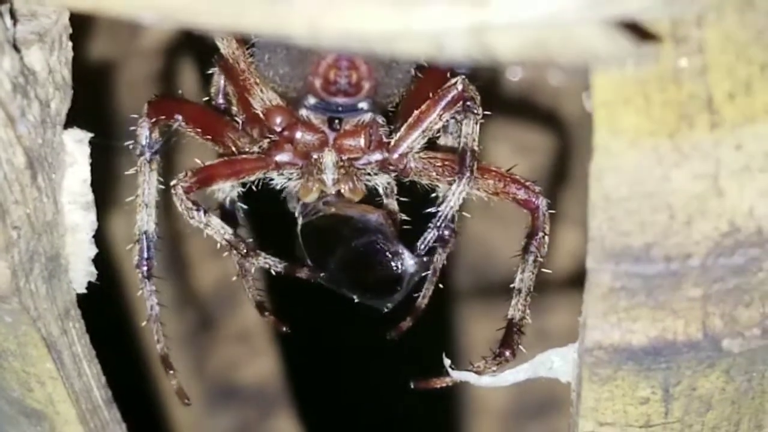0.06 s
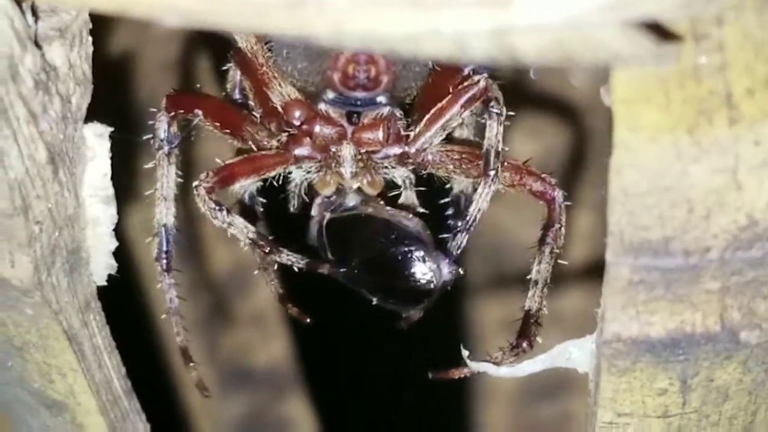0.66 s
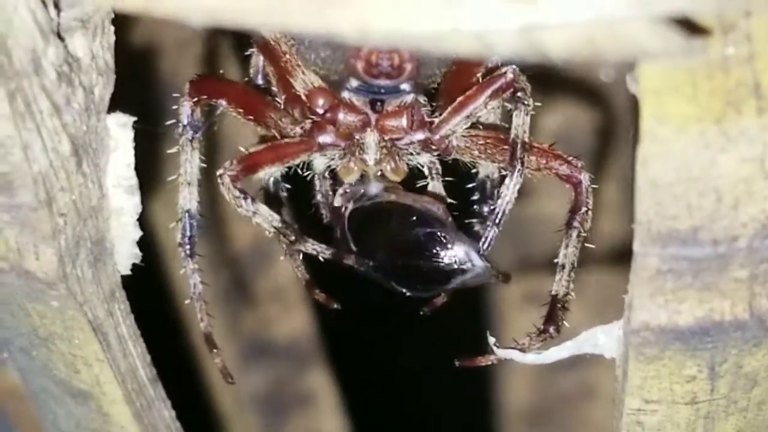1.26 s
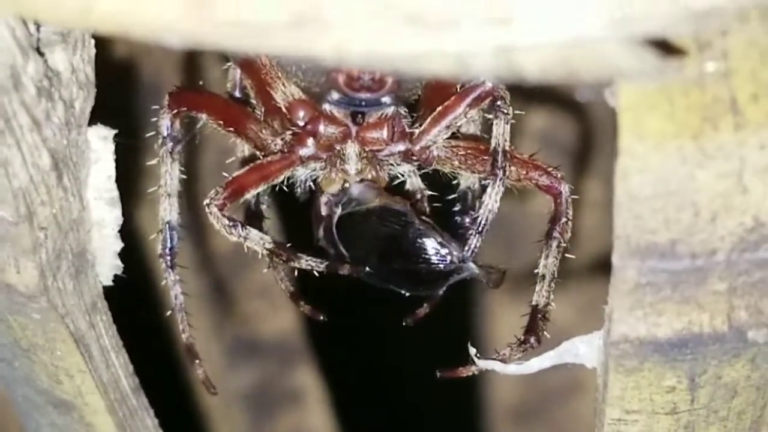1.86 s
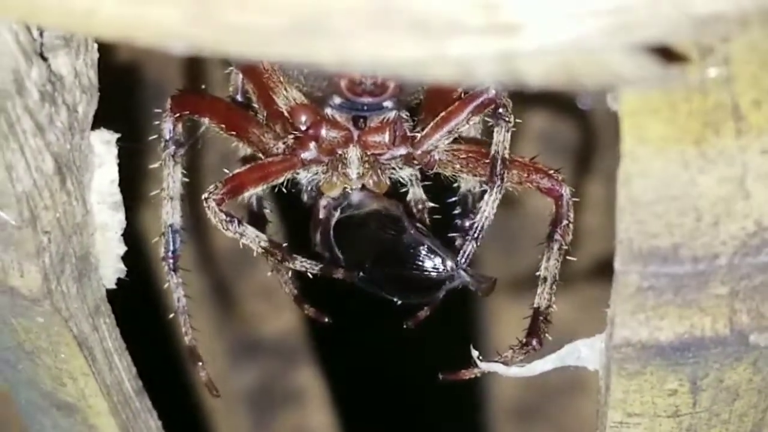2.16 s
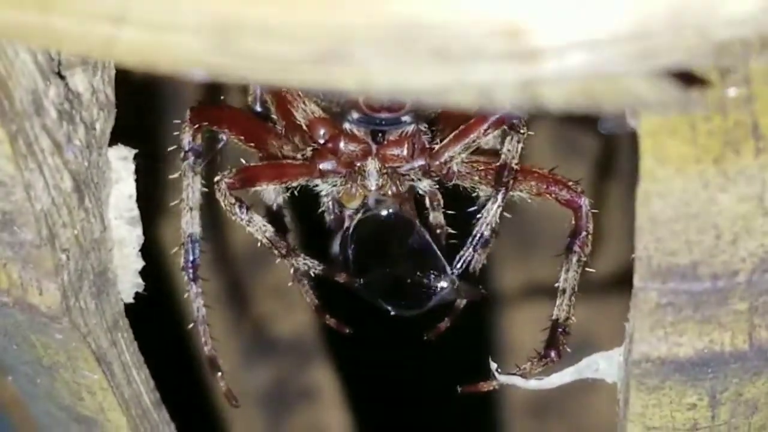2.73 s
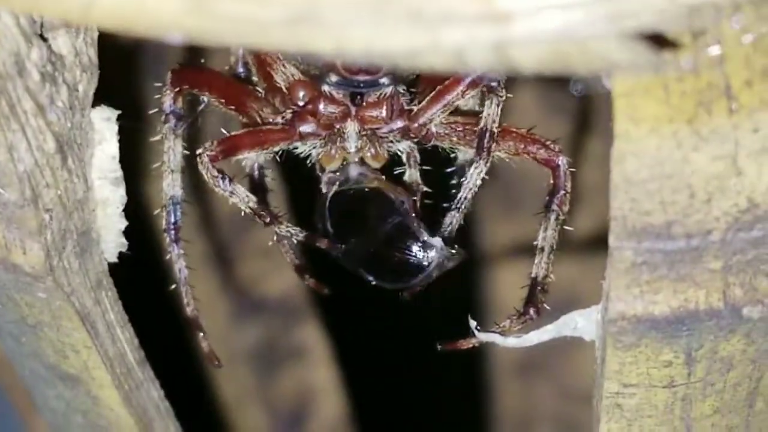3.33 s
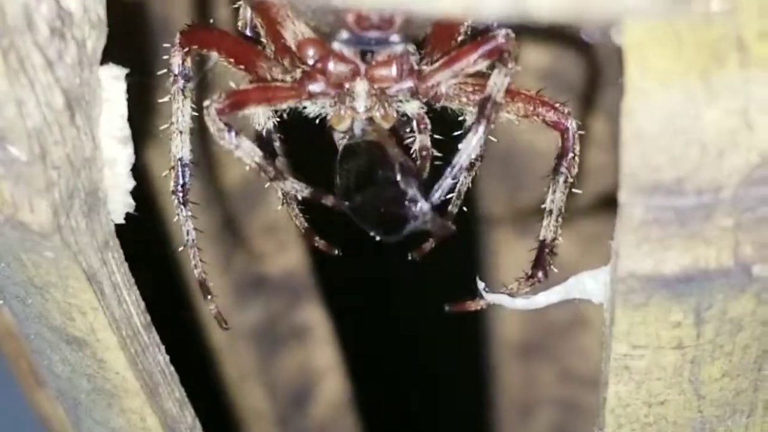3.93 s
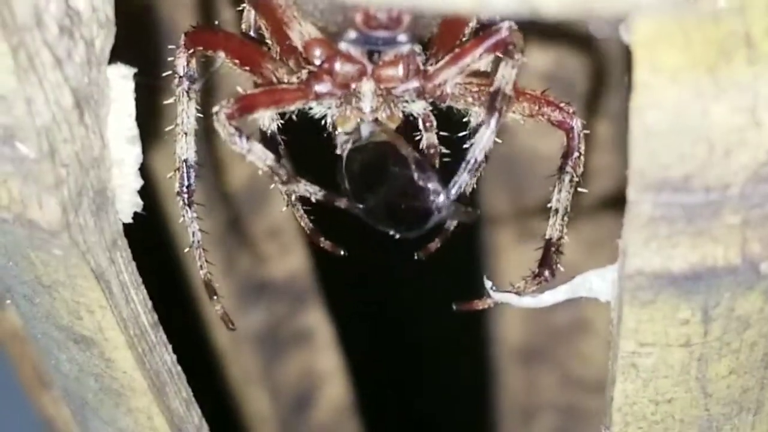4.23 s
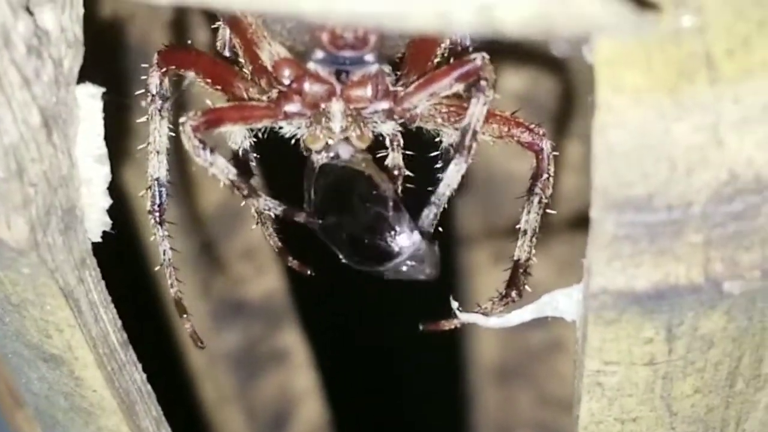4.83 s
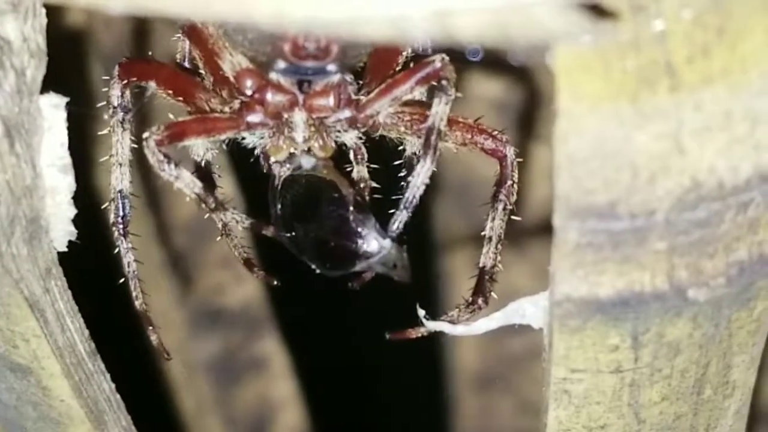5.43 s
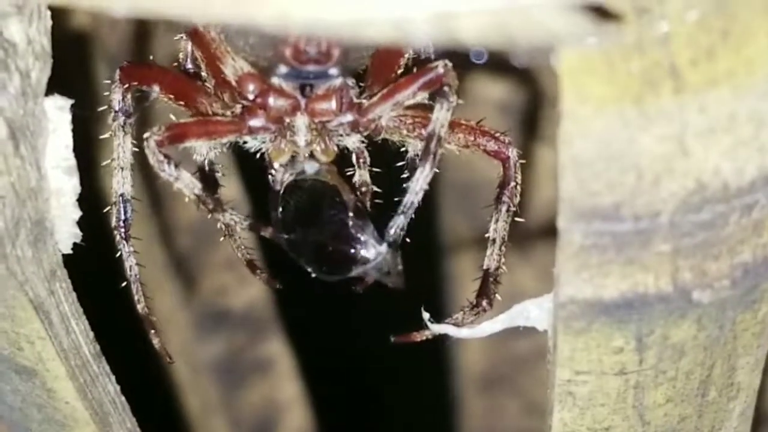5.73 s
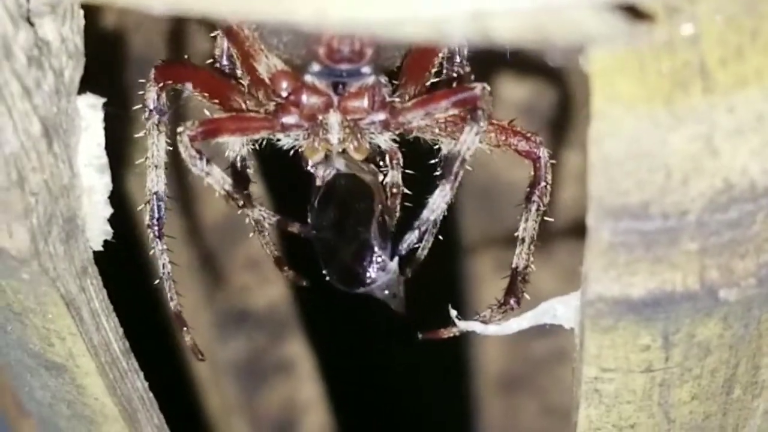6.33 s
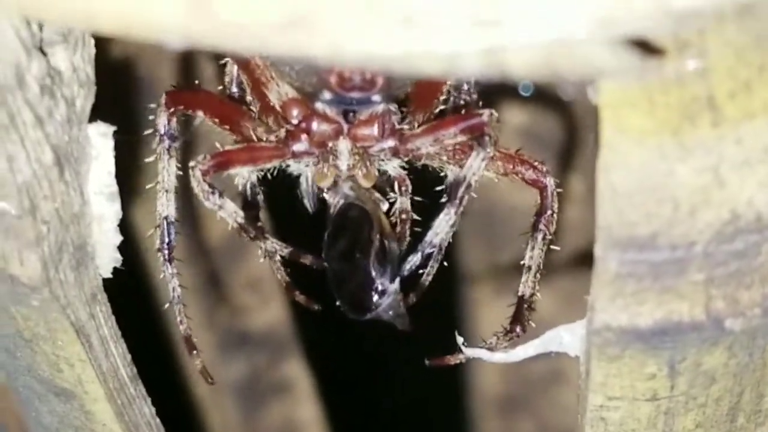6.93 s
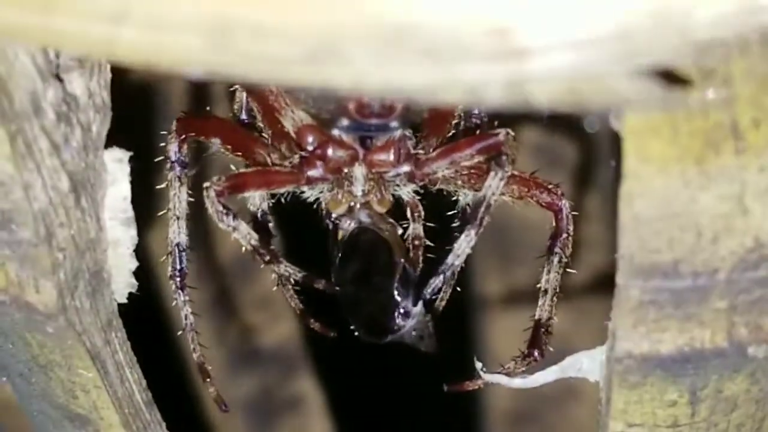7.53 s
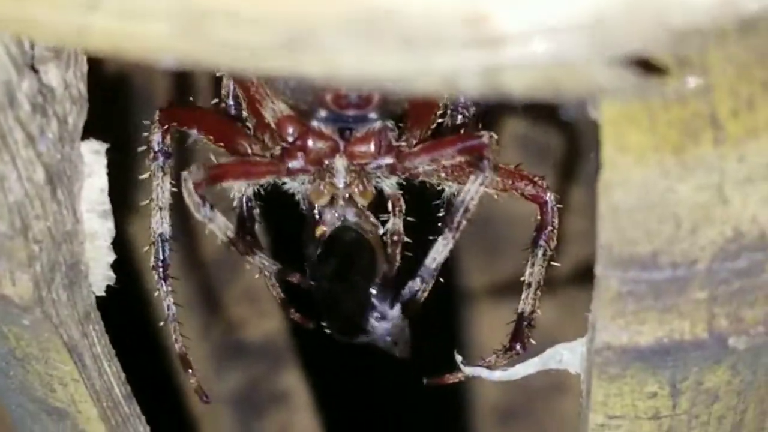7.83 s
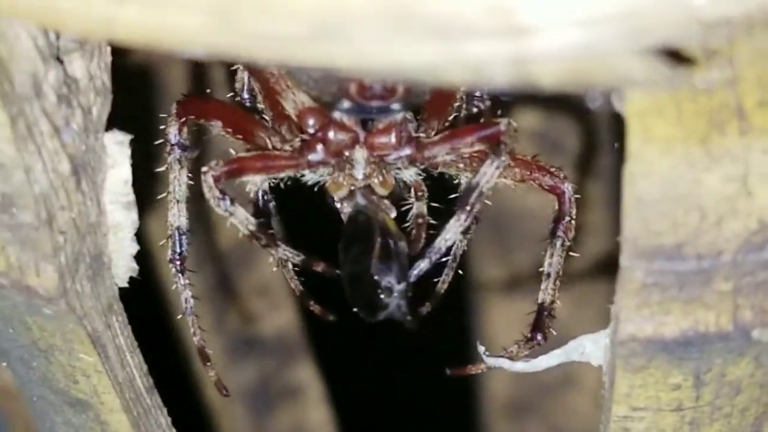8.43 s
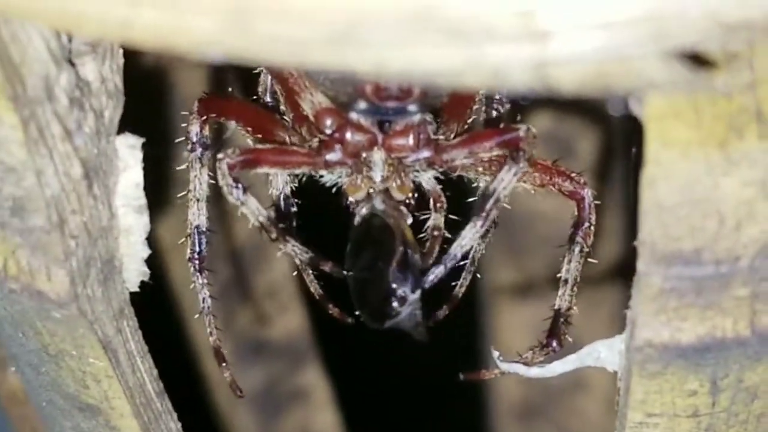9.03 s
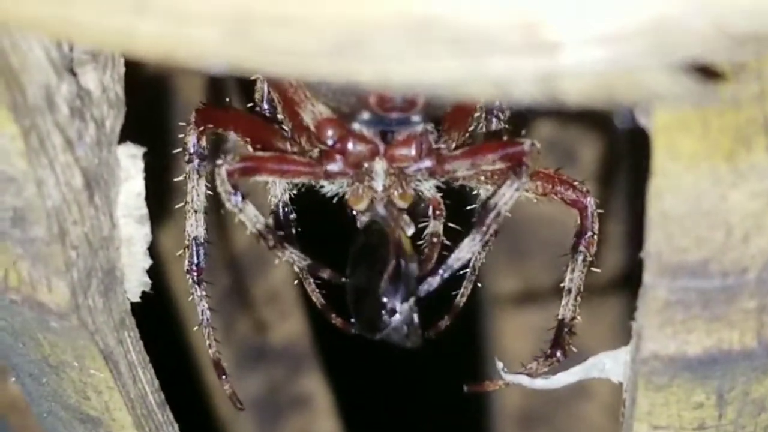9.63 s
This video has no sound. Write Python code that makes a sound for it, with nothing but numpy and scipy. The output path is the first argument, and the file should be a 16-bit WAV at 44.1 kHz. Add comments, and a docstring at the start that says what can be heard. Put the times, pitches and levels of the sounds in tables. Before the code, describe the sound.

Many crickets sing together outdoors at night: a steady, pure trill below shrill buzzes and evenly repeating high chirps. During the first three seconds a hand shifts on the microphone, making several sharp, loud clicks and soft rubs close on the left. The chorus then carries on, with a katydid giving brief dry rasps now and then over a distant insect shimmer and a faint motor hum.

```python
"""Outdoors at night, in a cricket chorus. Each closing stroke rings a cricket's wing: tree crickets
trill low, field crickets buzz and chirp above them. A katydid rasps now and then; a far swarm
shimmers over a faint motor hum. Early on, a hand shifts its grip on the microphone's case:
skin sticks and slips, ticking at the left port."""
import sys
import numpy as np
from scipy import signal
from scipy.fft import rfft, irfft, next_fast_len
from scipy.io import wavfile
from scipy.ndimage import map_coordinates

SR = 44100
rng = np.random.default_rng(int(sys.argv[2]) if len(sys.argv) > 2 else 0)


def pcm_store(signal):
    """Save signal as 16-bit PCM."""
    levels = np.round(np.clip(np.atleast_2d(signal), -1, 1) * 32767)
    wavfile.write(sys.argv[1], SR, levels.astype(np.int16).T)


N = 426888
TIME = np.arange(N) / SR

# how openly the chorus arrives, with a one-second dip: time_s, gain_db
OPENNESS = [(0, 3), (1.3, .5), (1.55, -1.5), (2.05, -3), (2.35, -4.5), (2.6, 0.5), (3.2, 1), (3.7, 0.5),
            (4.4, 2), (7, 2), (9.68, 2)]
# motor tones: pitch_hz, level_db
MOTOR_TONES = [(40, -80.5), (75.5, -65), (94.4, -72), (119, -74.5), (151, -82.5), (226.5, -81.5)]
# motor rumble: freq_hz, density_db
RUMBLE_SPECTRUM = [(15, -15), (42, 5.5), (90, 4), (130, 0), (180, -4), (240, -9), (330, -13.5), (450, -43),
                   (800, -61)]
# night hiss, left: freq_hz, density_db
HISS_LEFT = [(200, -10.5), (450, -23.5), (750, -11), (1150, -16), (1350, -0.5), (1600, -1.5), (1900, -8),
             (2500, -7), (3500, -11), (6000, -20), (8500, -58), (10800, -15.5), (14500, -21.5)]
# night hiss, right: freq_hz, density_db
HISS_RIGHT = [(1700, -63.5), (2000, 2), (2500, -2.5), (3500, -4), (6000, -6), (8500, -44), (10500, -8.5),
              (12500, -6), (14300, 4.5), (14900, -13.5), (15500, -60)]
# far swarm: freq_hz, density_db
SWARM_SPECTRUM = [(3000, -81), (3800, -37), (4300, -12), (4750, -0.5), (5150, -4.5), (5600, 1.5),
                  (6000, -3.5), (6400, -10), (6900, -13), (7500, -23.5), (8200, -62), (10000, -68)]
# chirps of the lower chirping cricket: centre_s
LOW_CHIRPS_S = [.12, .55, .88, 1.25, 1.81, 2.22, 2.6, 2.96, 3.49, 3.83, 4.2, 4.6, 5.17, 5.57, 5.94, 6.37,
                6.72, 7.08, 7.5, 7.86, 8.21, 8.66, 9.08, 9.55]
# katydid rasp: freq_hz, density_db
RASP_SPECTRUM = [(5000, -59), (6800, 9.5), (8500, -4), (10000, 4.5), (12500, -4.5), (15000, 13)]
# katydid phrases: first_syllable_s, level_db, syllable_count
KATYDID_PHRASES = [(2.03, -54.5, 5), (6.035, -46, 6), (8.815, -43.5, 4)]
# grip ticks: peak_s, level_db, ring_hz, t60_s, snap_re_ring_db
GRIP_TICKS = [(0.1091, -12, 1035, 0.008, 0), (0.1275, -22.5, 830, 0.008, -7),
              (0.2203, -38, 910, 0.004, 10.5), (0.3024, -5, 640, 0.0064, -9.5),
              (0.3185, -25, 720, 0.011, -1), (0.5035, -28.5, 820, 0.009, -12),
              (0.5458, -1, 740, 0.0054, -13), (0.8287, -9.5, 704, 0.014, -9.5),
              (0.879, -27, 270, 0.014, -23), (0.9796, -22.5, 447, 0.004, -18),
              (1.2415, -19.5, 640, 0.0035, -21), (1.278, -15, 440, 0.0055, -26),
              (1.2916, -20.5, 570, 0.0064, -20), (1.3463, -21, 547, 0.012, -20),
              (1.364, 0.5, 636, 0.005, -16), (1.3702, -16.5, 889, 0.009, -9),
              (2.2486, -36, 492, 0.0075, -20), (2.2872, -32, 932, 0.0038, -18),
              (2.4217, -34, 630, 0.0065, -20), (2.579, -34, 163, 0.016, -25),
              (2.7982, 0, 505, 0.0052, -13.5), (2.8118, -17.5, 800, 0.011, -5),
              (2.945, -18.5, 240, 0.011, -27), (3.685, -32, 1583, 0.006, -10),
              (4.3965, -40.5, 520, 0.004, -13)]
# bright modes of the case: pitch_hz, gain_db, t60_s
SNAP_MODES = [(2470, -0.5, 0.0043), (3837, -7, 0.0024)]
# fingers creeping in tiny slips: start_s, end_s, slip_count, level_db
FINGER_CREEPS = [(0.329, 0.779, 6, -34.5), (0.881, 1.36, 10, -31.5), (1.999, 2.751, 3, -43)]
# skin sliding on the case: centre_s, level_db, width_s
SKIN_RUBS = [(0.308, -37, 0.04), (0.557, -53.5, 0.058), (0.906, -38, 0.04), (1.292, -48, 0.066),
             (1.381, -38, 0.046), (2.807, -40, 0.048), (2.961, -47.5, 0.039)]
# skin friction: freq_hz, density_db
SKIN_SPECTRUM = [(30, -17), (90, 6.5), (500, -2), (1200, -10.5), (3000, -8), (5000, -25.5), (9000, -55.5)]
# swells of the lower field cricket: centre_s, level_db, width_s
BUZZ_SWELLS = [(0.204, -62, 0.82), (1.156, -45.5, .22), (2.605, -52.5, .15), (3.256, -50, 0.28),
               (4.242, -52.5, .15), (5.07, -49.5, 0.25), (5.49, -52, .14), (6.7, -49.5, 0.17),
               (7.48, -53, .19), (8.337, -58, 0.2), (8.715, -50, 0.12), (8.89, -46.5, 0.15)]
# loud bouts of the far tree cricket: start_s, end_s
FAR_TRILL_BOUTS = [(-.3, 0.52), (2.65, 3.9), (4.35, 6.15), (7.7, 11)]
# wing strokes of the near tree cricket: time_s, rate_hz
NEAR_STROKE_RATE = [(0, 45.42), (3, 45.39), (6, 45.29), (9.68, 45.27)]
# effort of the near tree cricket: time_s, level_db
NEAR_EFFORT = [(0, -50.5), (1.2, -51.5), (1.7, -52.5), (2.9, -50.5), (4.4, -51), (6.6, -48), (8.1, -49.5),
               (9.68, -49)]


def amp(db):
    """Decibels to gain."""
    return 10 ** (np.asarray(db) / 20)


def unit(x):
    """Scale to rms 1."""
    return x / np.sqrt(np.mean(x ** 2) + 1e-20)


def curve(rows):
    """(time_s, value) rows to one value per sample."""
    return np.interp(TIME, *np.transpose(rows))


def wobble(rate_hz):
    """Smooth random curve with knots at rate_hz."""
    knots = rng.standard_normal(int(N * rate_hz / SR) + 4)
    return map_coordinates(knots, [TIME * rate_hz], order=2, mode="nearest")


def filtered(x, response):
    """Apply a frequency response."""
    size = next_fast_len(N + 8192)
    return irfft(rfft(x, size) * response(np.fft.rfftfreq(size, 1 / SR)), size)[..., :N]


def noise(spectrum, channels=1):
    """Coloured noise, rms 1."""
    freq_hz, db = np.transpose(spectrum)
    white = rng.standard_normal((channels, N))
    return unit(filtered(white, lambda hz: amp(np.interp(np.log(hz + 1), np.log(freq_hz), db))))


def swell(centre_s, width_s):
    """Hann hump, width at half height."""
    return np.interp(TIME, centre_s + width_s * np.linspace(-1, 1, 33), np.hanning(33))


def bouts(spans_s, fade_s):
    """1 within each span, 0 between, linear fades."""
    return sum(np.clip(np.minimum(TIME - start, end - TIME) / fade_s + .5, 0, 1)
               for start, end in spans_s)


def pan(right_db):
    """Left and right gains."""
    return amp([[-right_db / 2], [right_db / 2]])


def outdoors(song, wet_db, t60_s, right_db, lag_s):
    """A song reaches the right port late; leaves and walls scatter it."""
    t = np.arange(SR // 3) / SR
    tail = rng.standard_normal((2, len(t))) * amp(-60 * t / t60_s)
    scatter = signal.fftconvolve(song[None], tail, axes=1)[:, :N]
    scatter = np.array([unit(side) for side in scatter])
    direct = np.array([song, filtered(song, lambda hz: np.exp(-2j * np.pi * hz * lag_s))])
    return unit(unit(direct) + amp(wet_db) * scatter) * pan(right_db)


def motor():
    """Distant hum in a low rumble, nearly alike at both ports."""
    hum = np.zeros(N)
    for hz, db in MOTOR_TONES:
        peak = np.sqrt(2) * amp(db + 1.2 * wobble(2.27))
        hum += peak * np.sin(2 * np.pi * hz * TIME + .33 * wobble(2.2))
    rumble = amp(-66.5) * noise(RUMBLE_SPECTRUM) + amp(-70) * noise(RUMBLE_SPECTRUM, channels=2)
    return (hum + rumble) * pan(-1.3)


def night_hiss():
    """Steady hiss, coloured differently on each side."""
    return np.vstack([amp(-53.5) * noise(HISS_LEFT), amp(-53) * noise(HISS_RIGHT)])


def swarm():
    """Countless far crickets merge into a fluttering shimmer."""
    flutter = amp(1.7 * np.array([wobble(250), wobble(250)]) + .48 * wobble(11))
    return amp(-46) * unit(noise(SWARM_SPECTRUM, channels=2) * flutter) * pan(9.6)


def wings(strokes, hz, fall_hz, duty, jitter_cycles, uneven_db=1, stumble_db=0):
    """Each closing stroke rings the wing; pitch falls as it slows. strokes is a running count."""
    index = np.floor(strokes - np.floor(strokes.min())).astype(int)
    offset, force = rng.standard_normal((N // 100, 2))[index].T
    progress = np.clip(strokes % 1 / duty, 0, 1)
    age_s = strokes % 1 / np.gradient(strokes, 1 / SR)
    cycles = age_s * (hz + fall_hz * (1 - progress) / 2) + jitter_cycles * offset
    stumbles = force < -1.8
    pressure = np.abs(np.sin(np.pi * progress ** .89)) * amp(uneven_db * force + stumble_db * stumbles)
    return unit(pressure * np.sin(2 * np.pi * cycles))


def chirping_cricket(times_s, hz, fall_hz, stroke_hz, width_s, level_db):
    """Wing strokes in short swelling chirps."""
    strokes = stroke_hz * TIME + .16 * wobble(5)
    song = wings(strokes, hz + 45 * wobble(8), fall_hz, duty=.92, jitter_cycles=.35)
    song *= sum(swell(s, width_s) for s in times_s)
    return amp(level_db) * outdoors(song, wet_db=4.5, t60_s=.17, right_db=10, lag_s=.0002)


def katydid(period_s=.088, width_s=.062, last_stress_db=2.5):
    """Phrases of dry, toothy rasps, loosely paced, the last rasp stressed."""
    syllables = np.zeros(N)
    for first_s, db, count in KATYDID_PHRASES:
        for k, (late, size) in enumerate(rng.standard_normal((count, 2))):
            stress_db = last_stress_db * (k == count - 1) + 1.1 * size
            syllables += amp(db + stress_db) * swell(first_s + k * period_s + .003 * late, width_s)
    rasp = unit(noise(RASP_SPECTRUM, channels=2) * amp(1.9 * wobble(630)))
    return syllables * rasp * pan(8.8)


def ring(t, hz, t60_s, rise_share=.42):
    """Case mode: builds over rise_share of its t60, peaks at t = 0, decays."""
    return np.cos(2 * np.pi * hz * t) * amp(-60 * np.maximum(t, -t / rise_share) / t60_s)


def finger_slips(ring_hz=460, t60_s=.0066, snap_db=-22.5, spread_db=2):
    """Tiny dull ticks scattered through each creep; rows as in GRIP_TICKS."""
    rows = []
    for start_s, end_s, count, db in FINGER_CREEPS:
        for k, (late, softness, pitch) in enumerate(rng.uniform(-.87, 1, (count, 3))):
            peak_s = start_s + (end_s - start_s) * (k + .5 + late / 2) / count
            rows.append((peak_s, db - spread_db * softness, ring_hz * 2 ** (.6 * pitch), t60_s, snap_db))
    return rows


def case_ticks(snap_lead_s=.0008, push_db=-33, push_hz=100, push_t60_s=.03):
    """Each slip of skin: a bright snap, a damped two-mode ring, a soft push of air."""
    t = np.arange(-SR // 40, SR // 20) / SR
    push = (t > 0) * np.sin(2 * np.pi * push_hz * t) * amp(push_db - 60 * np.abs(t) / push_t60_s)
    snap = sum(amp(db) * ring(t + snap_lead_s, hz, t60_s) for hz, db, t60_s in SNAP_MODES)
    ticks = np.zeros(N)
    for peak_s, db, hz, t60_s, snap_db in list(GRIP_TICKS) + finger_slips():
        body = ring(t, hz, t60_s) + amp(-16.5) * ring(t, 1.9 * hz, t60_s)
        start = round((peak_s + t[0]) * SR)
        ticks[start:start + len(t)] += amp(db) * (amp(snap_db) * snap + push - body)
    return signal.sosfilt(signal.butter(2, 70, "highpass", fs=SR, output="sos"), ticks)


def grip(rustle_db=-23, cutoff_hz=4600):
    """A hand ticks and slides on the case at the left port; soft skin makes no treble."""
    ticks = case_ticks()
    sliding = sum(amp(db) * swell(s, width_s) for s, db, width_s in SKIN_RUBS)
    for start_s, end_s, _, db in FINGER_CREEPS:
        sliding += amp(db + rustle_db) * bouts([(start_s, end_s)], fade_s=.08)
    friction = unit(noise(SKIN_SPECTRUM)[0] * amp(3.9 * wobble(400)))
    lowpass = signal.butter(6, cutoff_hz, fs=SR, output="sos")
    return signal.sosfilt(lowpass, ticks + sliding * friction) * amp([[0], [-30]])


def field_crickets(low_db=-51, high_db=-50):
    """Two shrill wing buzzes of wandering pitch: the lower swells in bouts, the higher runs on."""
    low = wings(45 * TIME + .3 * wobble(4), hz=4790 + 40 * wobble(7),
                fall_hz=391, duty=.655, jitter_cycles=.4)
    high = wings(68.3 * TIME + .13 * wobble(4), hz=5565 + 35 * wobble(9),
                 fall_hz=324, duty=.57, jitter_cycles=.41)
    swells = sum(amp(db) * swell(s, width_s) for s, db, width_s in BUZZ_SWELLS)
    low_gain = amp(low_db + 1.5 * wobble(6)) + swells
    high_gain = amp(high_db + 1.6 * wobble(8))
    low = outdoors(low, wet_db=7.5, t60_s=.11, right_db=.5, lag_s=.00023)
    high = outdoors(high, wet_db=-2, t60_s=.28, right_db=3.5, lag_s=.00021)
    return low * low_gain + high * high_gain


def tree_crickets(far_soft_db=-65, bout_boost_db=4.5):
    """Two pure, regular wing trills: the near one never rests, the far one rises in bouts."""
    strokes = np.cumsum(curve(NEAR_STROKE_RATE)) / SR + .47
    near = wings(strokes, hz=2949, fall_hz=330, duty=.85, jitter_cycles=.087,
                 uneven_db=1.84, stumble_db=-7.5)
    near = outdoors(near, wet_db=-9.5, t60_s=.22, right_db=2, lag_s=.00025)
    far = wings(55.6 * TIME + .04 * wobble(3), hz=2154, fall_hz=200, duty=.72, jitter_cycles=.21)
    far = outdoors(far, wet_db=-2, t60_s=.79, right_db=-.8, lag_s=.0001)
    far_db = far_soft_db + bout_boost_db * bouts(FAR_TRILL_BOUTS, fade_s=.2)
    return near * amp(curve(NEAR_EFFORT)) + far * amp(far_db)


def scene():
    """Chorus all around, hum beneath, hand close by."""
    open_db = curve(OPENNESS)
    beats_s = np.arange(.064, N / SR, .413)  # the highest cricket chirps almost evenly
    beats_s += .025 * rng.standard_normal(64)[:len(beats_s)]
    chirps = chirping_cricket(LOW_CHIRPS_S, hz=5940, fall_hz=260, stroke_hz=70,
                              width_s=.14, level_db=-59)
    chirps += chirping_cricket(beats_s, hz=7540, fall_hz=200, stroke_hz=80, width_s=.073, level_db=-71.5)
    distant = (swarm() + night_hiss() + chirps) * amp(open_db) + motor() * amp(.5 * open_db)
    crickets = tree_crickets() * amp(open_db) + field_crickets() * amp(1.2 * open_db)
    return distant + crickets + katydid() + grip()


def record(dry, top_hz=14650):
    """Limit to full scale; cut everything above top_hz."""
    return filtered(np.clip(dry, -1, 1), lambda hz: hz < top_hz)


dry = scene()
out = record(dry)
pcm_store(out)
```